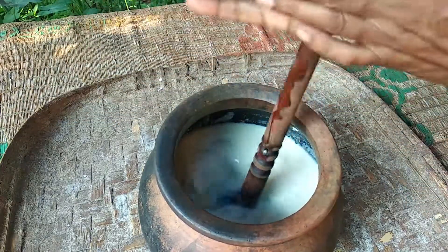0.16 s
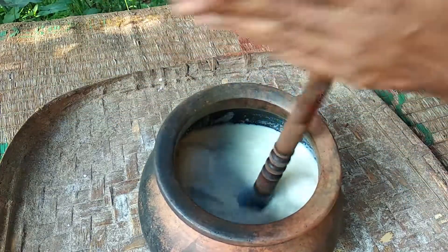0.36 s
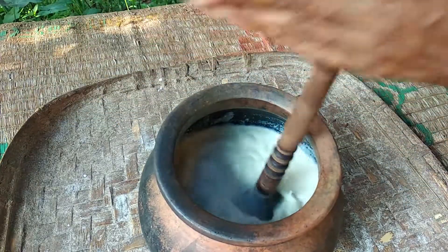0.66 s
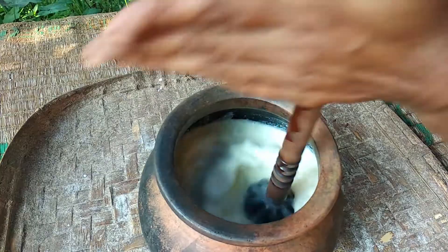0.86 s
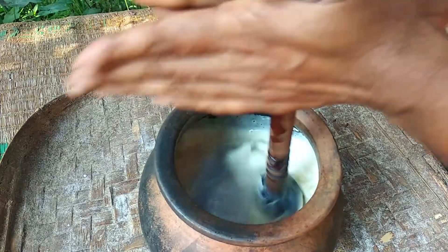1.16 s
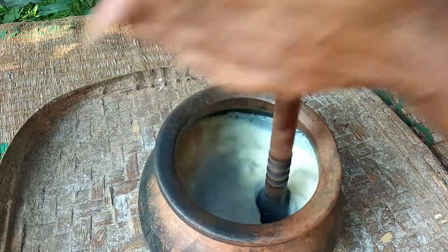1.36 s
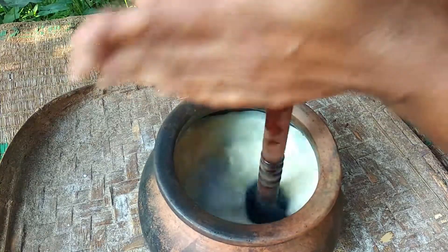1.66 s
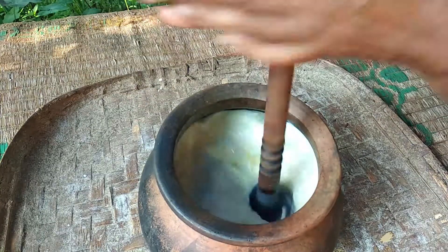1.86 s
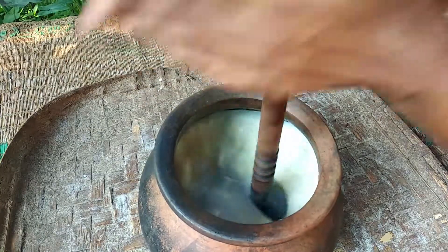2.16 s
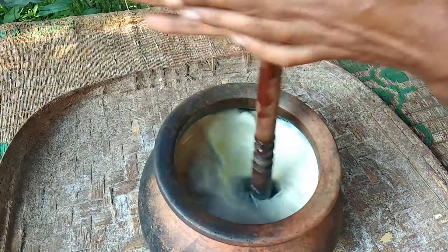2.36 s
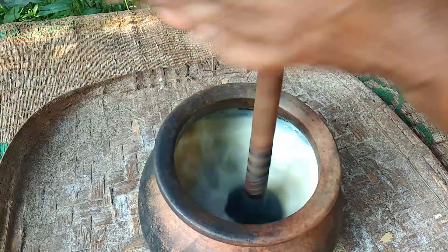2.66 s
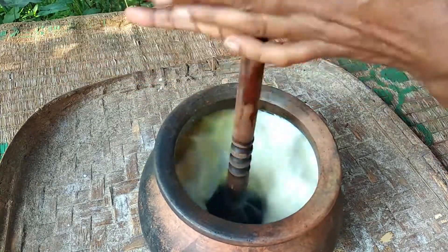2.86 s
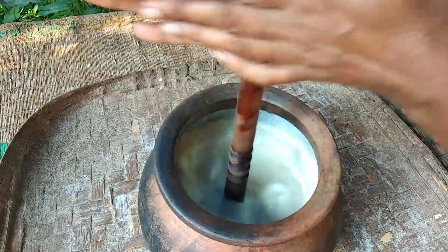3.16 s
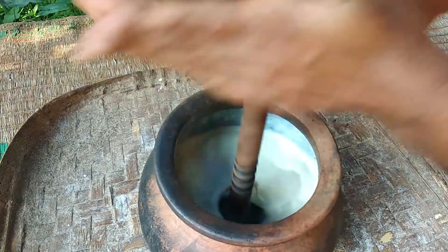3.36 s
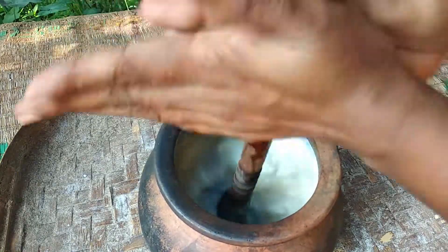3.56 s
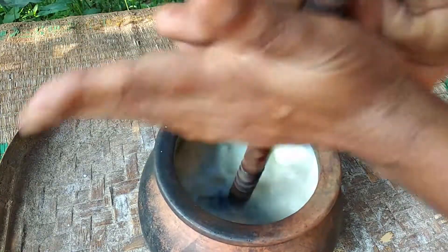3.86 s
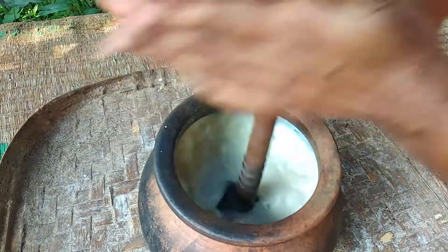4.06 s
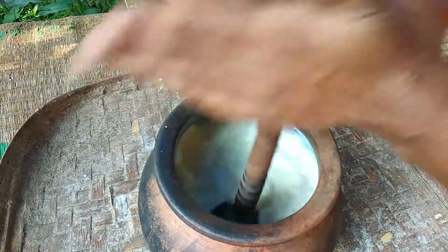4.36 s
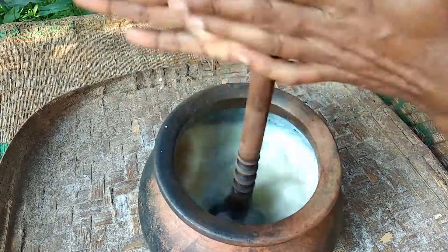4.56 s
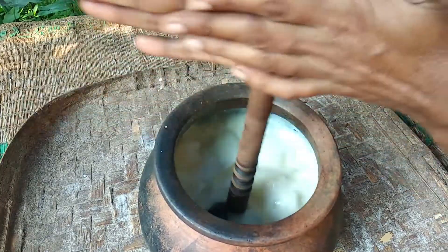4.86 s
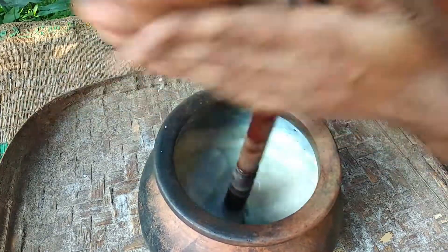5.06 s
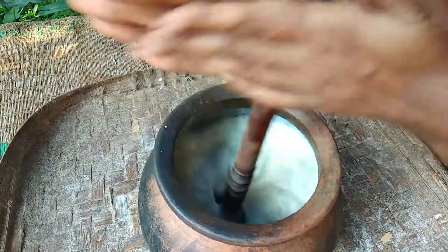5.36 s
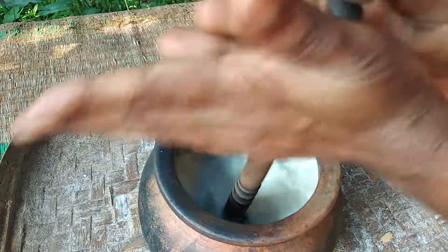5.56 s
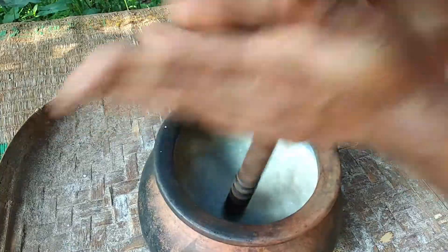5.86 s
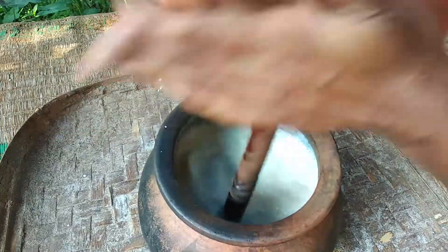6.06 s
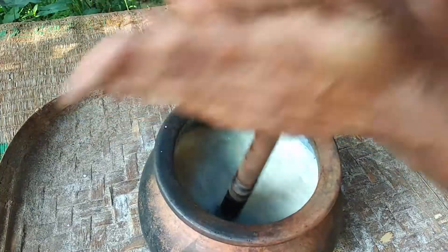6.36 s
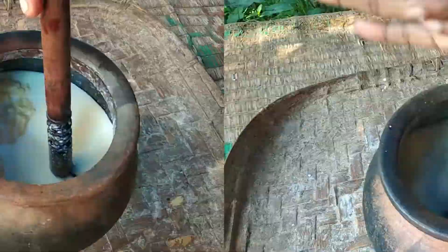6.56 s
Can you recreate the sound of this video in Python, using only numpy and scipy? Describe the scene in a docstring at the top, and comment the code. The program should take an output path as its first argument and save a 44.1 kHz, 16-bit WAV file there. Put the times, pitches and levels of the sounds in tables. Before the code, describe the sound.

From the start, a wooden stick churns curd in a clay pot, sloshing in a fast, even rhythm of about seven strokes a second. Each stroke blends a low wet heave, a gurgle, a small splash and a hiss of froth, coloured by the hollow of the pot. Air pockets gulp irregularly, most clearly around 0.5, 1.1, 2.4 and 5.1 seconds. Single bubbles plip throughout, with a bright one at 3 seconds, and the froth gives an occasional faint spit. The strokes are splashier and brighter from about 1.7 to 3 seconds, dip briefly near 3.3, then pick up again around 4. From about 5.7 seconds they turn deeper and gradually softer, stopping short at about 6.6 seconds. The sound is close, with a slight, short room echo and a very quiet background.

```python
"""A wooden churning stick is rolled between the palms in a clay pot of curd, about seven strokes a second.
Each stroke heaves the curd (slosh), folds air in (gurgle), throws drops (splash) and tears the froth
(spray): four layers of ringing bubbles over a liquid rush. Now and then a big air pocket gulps, a lone
bubble plips or the froth spits. The hollow of the pot colours the churning and the gulps; behind it all
sit a short room echo and a faint bed of air."""
import sys
import numpy as np
from scipy import signal
from scipy.fft import rfft, irfft
from scipy.io import wavfile
from scipy.ndimage import uniform_filter1d, map_coordinates

SR = 44100
rng = np.random.default_rng(int(sys.argv[2]) if len(sys.argv) > 2 else 0)


def dump_mix(stems):
    """Bounce the given channels to the path in sys.argv[1] as a 16-bit WAV at rate SR."""
    frames = np.atleast_2d(stems).T  # one column per channel
    limited = np.clip(frames, -1, 1)  # hard clip at full scale
    pcm = np.round(limited * 32767).astype(np.int16)
    wavfile.write(sys.argv[1], SR, pcm)


N = 295470
TIME = np.arange(N) / SR
AGE = np.arange(SR // 10) / SR   # seconds into one short event
EARS = np.array([[1], [-1]])   # left, right

# strokes of the stick: peak_s, strength_db, paddle_depth (0 skimming, 1 buried)
STICK_STROKES = [(0.012, -31.5, 0.79), (0.156, -26.5, 0.81), (0.308, -25.5, 0.58), (0.457, -26.5, 0.75),
                 (0.597, -26.5, 0.64), (0.752, -27, 0.53), (0.878, -27, 0.55), (1.019, -26, 0.38),
                 (1.146, -26, 0.55), (1.285, -28.5, 0.67), (1.415, -27, 0.4), (1.563, -27, 0.6),
                 (1.691, -26, 0.42), (1.836, -25.5, 0.29), (1.954, -24.5, 0.41), (2.095, -25, 0.28),
                 (2.215, -24, 0.47), (2.378, -28.5, 0.36), (2.479, -29, 0.69), (2.628, -31.5, 0.75),
                 (2.748, -27, 0.37), (2.895, -23, 0.0), (2.995, -26, 0.29), (3.13, -30.5, 0.5),
                 (3.287, -32.5, 0.72), (3.436, -30, 0.74), (3.565, -28, 0.55), (3.711, -28.5, 0.39),
                 (3.849, -28, 0.62), (3.991, -24, 0.33), (4.126, -26, 0.75), (4.27, -27, 0.7),
                 (4.423, -32.5, 0.54), (4.566, -25.5, 0.44), (4.693, -29, 0), (4.842, -27, 0.34),
                 (4.981, -30, 0.73), (5.138, -29, 0.7), (5.273, -29.5, 0.68), (5.419, -28, 0.67),
                 (5.541, -27.5, 0), (5.711, -29, 0.9), (5.817, -32, 0.79), (5.984, -28.5, 0.74),
                 (6.113, -31.5, 0.73), (6.259, -32, 0.75), (6.401, -31.5, 0.8), (6.555, -37.5, 0.85)]
# attack of the strokes, short where the palms jerk: time_s, base_rise_s
STROKE_ATTACK = [(0.1, 0.025), (1.3, 0.041), (2.9, 0.032), (3.3, 0.0053), (3.9, 0.032), (4.25, 0.015),
                 (4.5, 0.036), (5.8, 0.034), (6.3, 0.012)]
# what a stroke stirs up, one row each for slosh, gurgle, splash and spray:
# skimming_db, buried_db (both against the stroke), swirl_db, brevity (shortens rise and fall), lag_s
LAYER_MIX = [(-28, 12.5, -46, 1.26, 0.0062), (-4.5, 3.5, -43.5, 1.34, 0.006),
             (-0.5, -0.3, -48.5, 1.397, 0.0019), (3.5, -3.5, -44, 1.49, 0)]
# level ride on the gurgle, as more or less air is folded in: time_s, gain_db
FOLDED_AIR = [(0.0, -3.5), (1.7, 3), (2.9, -5.5), (3.4, 0.5), (4.7, -2.5), (6.55, 0.5)]
# level ride on the swirl between strokes, up as the curd gathers speed: time_s, gain_db
SWIRL_RIDE = [(0.7, -6.5), (1.1, 8), (2.1, -2.5), (2.6, -1)]
# air pockets that close behind the paddle: start_s, pitch_hz, peak_db
AIR_POCKETS = [(0.148, 428, -11), (0.157, 340, -12), (0.17, 368, -11.5), (0.248, 493, -17.5),
               (0.471, 480, -7), (.473, 297, -4.5), (0.513, 437, -18), (0.602, 430, -19.5),
               (0.76, 450, -17.5), (0.83, 453, -19.5), (1.116, 413, -7), (1.202, 436, -26),
               (1.238, 415, -13), (1.653, 435, -16.5), (2.175, 422, -10.5), (2.434, 406, -9),
               (2.491, 445, -25), (2.999, 454, -18), (3.164, 430, -15.5), (3.293, 447, -18),
               (3.866, 406, -15.5), (4.133, 350, -11.5), (4.202, 302, -16.5), (4.264, 390, -15.5),
               (4.438, 406, -22.5), (4.98, 497, -22), (5.106, 370, -9), (5.399, 410, -12.5),
               (5.71, 380, -12), (5.854, 280, -20.5), (6.116, 519, -11.5), (6.13, 438, -17),
               (6.311, 350, -24)]
# lone bubbles and drops: start_s, pitch_hz, level_db
LONE_BUBBLES = [(0.373, 2110, -13), (0.436, 2290, -17), (0.512, 2160, -11), (0.537, 1167, -17.5),
                (0.604, 2280, -13.5), (0.736, 4230, -14.5), (1.12, 1320, -13), (1.121, 726, -11.5),
                (1.295, 767, -27), (1.479, 3250, -19.5), (1.572, 2230, -11.5), (1.679, 1920, -13),
                (1.892, 850, -14.5), (1.967, 1047, -16.5), (2.068, 2000, -13.5), (2.139, 2000, -13.5),
                (2.332, 2100, -16.5), (2.434, 1920, -15.5), (2.738, 1140, -17.5), (2.837, 1040, -18),
                (3.002, 2810, -7), (3.952, 4260, -10), (4.269, 2290, -11.5), (4.331, 2010, -16.5),
                (4.717, 894, -16.5), (4.894, 770, -19), (4.979, 854, -15.5), (5.142, 4290, -15.5),
                (5.696, 2200, -15.5)]
# patches of froth that burst in a soft spit: peak_s, pitch_hz, level_db
FROTH_BURSTS = [(0.18, 9700, -25), (3.216, 11500, -24.5), (3.435, 6530, -24.5), (3.807, 9400, -24),
                (5.846, 7900, -24)]
# resonances and dips of the pot's hollow: centre_hz, width_hz, gain_db
POT_RESONANCES = [(317, 29, 5), (452, 84, 11), (1168, 61, 8), (1747, 150, -11.5), (2257, 140, 3.5),
                  (2824, 170, 4.5), (3750, 100, -19.5), (4420, 350, 5.5), (4655, 160, -15.5),
                  (5540, 250, -10.5)]
# tone of the moving curd: frequency_hz, gain_db
CURD_TONE = [(30, -16), (200, -8.5), (320, -14), (500, 0), (800, -1.5), (1400, -2.5), (2200, 1.5),
             (4000, 1), (6000, -3), (9000, 0.5), (16000, -8.5)]
# how alike the two ears are: frequency_hz, likeness (0 wide, 1 mono)
EAR_LIKENESS = [(500, 0.96), (1300, 0.38), (2200, 0.97), (6000, 0)]
# pan of the moving curd: frequency_hz, lean_db (up on the left, down on the right)
LEFT_LEAN = [(480, 0.57), (630, -3.5), (1000, 1), (7300, -0.4), (10000, 1.46)]


def from_db(db):
    return 10 ** (np.asarray(db) / 20)


def unit_rms(x):
    return x / np.sqrt(np.mean(x ** 2) + 1e-20)


def at_hz(points, hz):
    """Read a curve on a log-frequency axis."""
    known_hz, values = np.transpose(points)
    return np.interp(np.log(np.maximum(hz, 1)), np.log(known_hz), values)


def at_time(points, s):
    return np.interp(s, *np.transpose(points))


def add(out, sound, start_s=0):
    start = int(max(start_s, 0) * SR)
    out[..., start:start + sound.shape[-1]] += sound[..., :max(N - start, 0)]


def band(x, low_hz, high_hz, order=2):
    edges_hz = [low_hz, min(high_hz, .45 * SR)]
    return signal.sosfilt(signal.butter(order, edges_hz, "band", fs=SR, output="sos"), x)


def puff(low_hz, high_hz, order=2):
    """A short piece of band noise, different in each ear; rms 1."""
    return unit_rms(band(rng.standard_normal((2, len(AGE))), low_hz, high_hz, order))


def quiet_air():
    """A steady bed of dark noise; rms 1."""
    return unit_rms(signal.lfilter([1], [1, -.97], rng.standard_normal((2, N))))


def echoes(x, t60_s, first_s, low_hz, high_hz, block=4096):
    """A dense scatter of reflections, different for each ear and changing as curd and hands move."""
    out, age = np.zeros((2, N)), np.arange(block) / SR
    padded = np.hstack([band(x, low_hz, high_hz, order=1), out])
    decay = np.exp(-np.log(1000) * age / t60_s) * (age > first_s)
    for i in range(0, N, block // 2):
        tail = rng.standard_normal((2, block)) * decay / np.linalg.norm(decay)
        send = np.sqrt(np.hanning(block)) * padded[:, i:i + block]
        add(out, signal.fftconvolve(send, tail, axes=1), i / SR)
    return out


def pot(x):
    """The hollow rings at its resonances and swallows the pitches between them."""
    for hz, width_hz, gain_db in POT_RESONANCES:
        damp, turn = np.pi * width_hz / SR, -2 * np.cos(2 * np.pi * hz / SR)
        lift = damp * from_db(gain_db)
        x = signal.lfilter([1 + lift, turn, 1 - lift], [1 + damp, turn, 1 - damp], x + 1e-18)
    return x


def spits(swell_s=0.0097, spread=0.052):
    """A patch of like-sized froth bubbles bursts in one short, narrow puff."""
    out = np.zeros((2, N))
    swell = np.exp(-((AGE - AGE.mean()) / swell_s) ** 2)
    for peak_s, hz, level_db in FROTH_BURSTS:
        fizz = puff(hz - hz * spread, hz + hz * spread, order=1)
        add(out, from_db(level_db) * swell * fizz, peak_s - AGE.mean())
    return out


def bubble(hz, t60_s, glide):
    """A dying sine that swells over its first cycle and bends up as the bubble nears the surface."""
    age = np.arange(int(t60_s * SR) + 2) / SR
    envelope = (1 - np.exp(-2 * hz * age)) * np.exp(-np.log(1000) * age / t60_s)
    return envelope * np.sin(2 * np.pi * hz * age * (1 + glide * age / t60_s / 2))


def plips(cycles=62, snap_db=-14, snap_s=0.011, snap_ratio=1.9):
    """The film snaps, and the bubble under it rings for a few dozen cycles."""
    out = np.zeros((2, N))
    for start_s, hz, level_db in LONE_BUBBLES:
        snap = puff(hz / snap_ratio, hz * snap_ratio) * np.exp(-AGE / snap_s)
        add(out, from_db(level_db + snap_db) * snap, start_s)
        add(out, from_db(level_db) * bubble(hz, cycles / hz, glide=0.03), start_s)
    return out


def gulps(slap_db=-12, slap_s=0.007, ragged=0.5):
    """A closing air pocket slaps raggedly and rings upwards; the bigger it is, the more it thuds."""
    out = np.zeros(N)
    biggest_db = max(db for *_, db in AIR_POCKETS)
    for start_s, hz, peak_db in AIR_POCKETS:
        slap, sputter = puff(450, 3200)[0], puff(40, 250)[0]
        pocket = from_db(slap_db) * unit_rms(slap * np.exp(ragged * sputter)) * np.exp(-AGE / slap_s)
        add(pocket, bubble(hz, t60_s=0.04 * rng.uniform(.75, 1.33), glide=0.17))
        thud_db = -3 + 0.45 * (peak_db - biggest_db)
        add(pocket, from_db(thud_db) * bubble(hz=255, t60_s=0.02, glide=0))
        gulp = pot(band(pocket, 150, SR, order=3))
        add(out, from_db(peak_db) * gulp / np.abs(gulp).max(), start_s)
    return out


def liquid_rush():
    """The smooth rush of liquid, widest in the high treble; rms 1."""
    mid, side = rfft(rng.standard_normal((2, N)))
    alike = np.clip(at_hz(EAR_LIKENESS, np.arange(len(mid)) * SR / N), 0, 1)
    return unit_rms(irfft(np.sqrt(1 + alike) * mid + np.sqrt(1 - alike) * side * EARS, N))


def swarm(low_hz, high_hz, cycles, glide, spread_db, clump_db, count, clumps_per_s=45):
    """Bubbles at random moments and places in the pot, in clumps of like size; stereo, rms 1."""
    out = np.zeros((2, N))
    jitter, pitch, strength, life, place = rng.random((5, count))
    start_s = (np.arange(count) + jitter) / count * N / SR
    hz = low_hz * (high_hz / low_hz) ** pitch
    t60_s = cycles * (.5 + life) / hz
    clump_map = rng.uniform(-3.03, 1, size=(count, 8))   # loud and soft patches over time and pitch
    clump = map_coordinates(clump_map, [start_s * clumps_per_s, pitch * 7], order=1, mode="mirror")
    gain = from_db(spread_db * strength ** 2 + clump_db * clump)
    # short waves reach the two ears with unrelated strengths
    apart = np.arccos(np.clip(at_hz(EAR_LIKENESS, hz), 0, 1)) / 2
    ear_gains = gain * np.cos(2 * np.pi * place + EARS * apart)
    for k in range(count):
        add(out, ear_gains[:, k, None] * bubble(hz[k], t60_s[k], glide), start_s[k])
    return unit_rms(out)


def liquid(bubbles, rush, rush_db, low_hz, high_hz, leveller_s=0.048):
    """Bubbles over a rush, in one band, heard out of the pot and held at an even level of 1."""
    hz = np.linspace(1, SR / 2, N // 2 + 1)
    rolloff = np.sqrt((1 + (low_hz / hz) ** 10) * (1 + (hz / high_hz) ** 10))
    colour = from_db(at_hz(CURD_TONE, hz) + EARS * at_hz(LEFT_LEAN, hz)) / rolloff
    grains, smooth = (unit_rms(irfft(rfft(x) * colour, N)) for x in (bubbles, rush))
    sound = pot(grains + from_db(rush_db) * smooth)
    # the paddle sets the energy; chance only deals it among the bubbles
    power = uniform_filter1d(np.mean(sound ** 2, axis=0), int(leveller_s * SR))
    return sound / np.sqrt(uniform_filter1d(power, int(leveller_s * SR / 2)) + 1e-12)


def squelch(x, start_hz=640, width_hz=180, ring_db=3, lead_strokes=0.4, scatter_octaves=0.16):
    """The cavity behind the paddle shrinks through each stroke: its resonance sweeps up an octave."""
    peaks_s, *_ = np.transpose(STICK_STROKES)
    stroke, progress = np.divmod(np.interp(TIME, peaks_s, np.arange(len(peaks_s))) + lead_strokes, 1)
    detune = scatter_octaves * rng.standard_normal(len(peaks_s))
    hz = start_hz * 2 ** (progress + detune[stroke.astype(int)])
    turn, damp = np.exp(2j * np.pi * np.cumsum(hz) / SR), np.pi * width_hz / SR
    ring = turn * signal.lfilter([damp], [1, damp - 1], x / turn)
    return unit_rms(x + from_db(ring_db) * ring.real)


def stroke_envelopes(base_fall_s=0.033, wash_db=-21, wash_s=0.09, squareness=0.95):
    """Strokes swell and ebb over the swirl; a buried paddle heaves curd, a skimming one tears froth."""
    t = np.linspace(0, N / SR, N // 40)
    skimming_db, buried_db, swirl_db, brevity, lag_s = np.transpose(LAYER_MIX)[:, :, None]
    power = 0
    for stroke_s, strength_db, depth in STICK_STROKES:
        levels_db = strength_db + skimming_db + (buried_db - skimming_db) * np.clip(depth, 0, 1)
        levels_db[1] += at_time(FOLDED_AIR, stroke_s)   # gurgle only
        peak_s = stroke_s + lag_s
        slope_s = np.where(t < peak_s, at_time(STROKE_ATTACK, stroke_s), base_fall_s)
        from_peak = np.minimum((np.abs(t - peak_s) / slope_s) ** squareness, 20)
        power = power + (from_db(levels_db) / np.cosh(brevity * from_peak)) ** 2
    # a soft wash spreads to both sides of each stroke
    wash = from_db(wash_db) ** 2 * uniform_filter1d(power, int(wash_s / t[1]), axis=1)
    swirl = from_db(swirl_db + at_time(SWIRL_RIDE, t)) ** 2
    return [np.interp(TIME, t, np.sqrt(layer)) for layer in power + wash + swirl]


def churning():
    """Four sizes of bubble, from fat pockets to froth, all driven by the strokes."""
    heave, fold, throw, tear = stroke_envelopes()
    rush = liquid_rush()
    fat = swarm(267, 529, cycles=4.6, glide=0.24, spread_db=2.5, clump_db=0, count=1100)
    slosh = liquid(fat, rush, rush_db=-11.5, low_hz=26, high_hz=580)
    medium = swarm(560, 1754, cycles=36.7, glide=0.25, spread_db=9, clump_db=1.5, count=1700)
    gurgle = liquid(medium, rush, rush_db=-4.5, low_hz=673, high_hz=1840)
    small = swarm(1618, 6060, cycles=66, glide=0.04, spread_db=4, clump_db=8, count=4800)
    splash = liquid(small, rush, rush_db=-5.5, low_hz=1780, high_hz=6770)
    froth = swarm(5316, 16000, cycles=120, glide=0.02, spread_db=3, clump_db=6.5, count=16000)
    spray = liquid(froth, rush, rush_db=-7, low_hz=5960, high_hz=18500)
    return heave * slosh + fold * squelch(gurgle) + throw * splash + tear * spray


def scene(stop_s=6.582, fade_s=0.0013):
    """The pot of curd in a small room; it stops short and leaves the quiet air."""
    curd = churning() + gulps() + plips() + spits()
    # the treble bounces about inside the pot before it gets out
    curd = curd + from_db(-4) * echoes(curd, t60_s=.06, first_s=.0004, low_hz=3600, high_hz=18000)
    room = from_db(-13) * echoes(curd, t60_s=.1, first_s=.004, low_hz=500, high_hz=4500)
    gate = np.clip((stop_s - TIME) / fade_s, 0, 1)
    return gate * (curd + room) + from_db(-65) * quiet_air()


def record(dry, cutoff_hz=15900):
    """A steep high cut on the whole mix."""
    return signal.sosfilt(signal.ellip(12, .1, 80, cutoff_hz, fs=SR, output="sos"), dry)


dry = scene()
out = record(dry)
dump_mix(out)
```